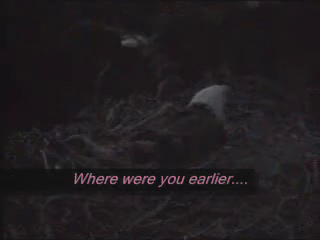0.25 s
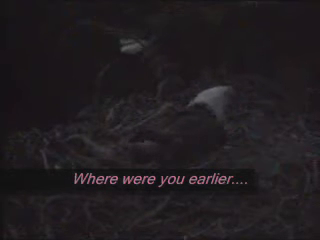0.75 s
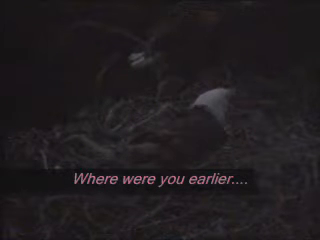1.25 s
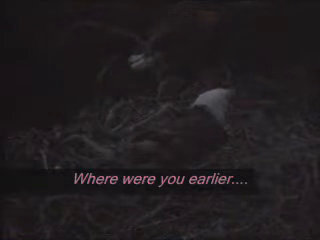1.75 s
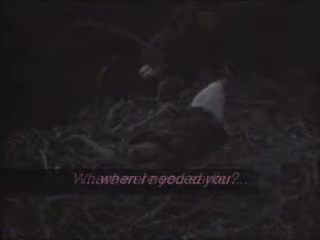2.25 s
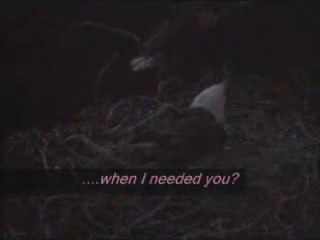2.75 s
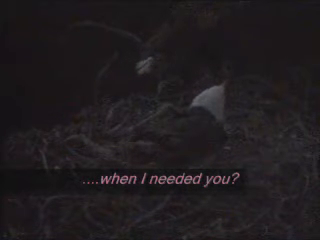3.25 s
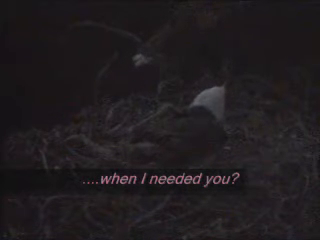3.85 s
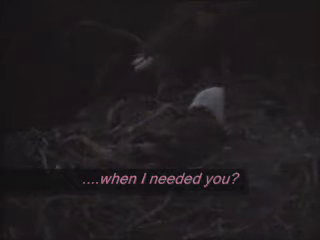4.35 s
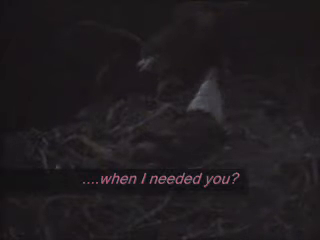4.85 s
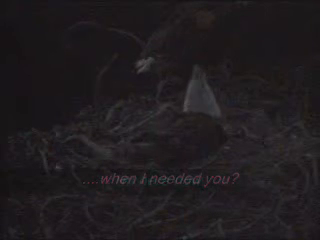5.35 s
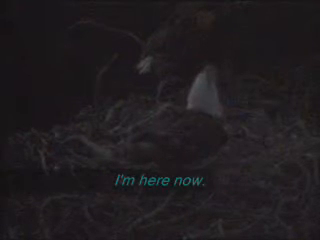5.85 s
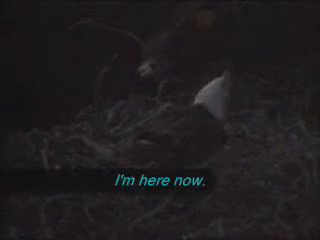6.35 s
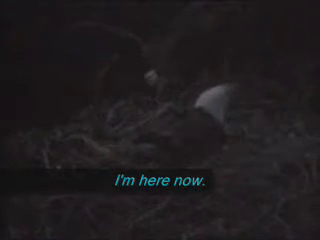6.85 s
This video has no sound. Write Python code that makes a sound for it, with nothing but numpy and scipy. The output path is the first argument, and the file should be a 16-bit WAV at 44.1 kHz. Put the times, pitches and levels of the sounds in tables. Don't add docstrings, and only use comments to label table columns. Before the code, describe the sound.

At a woodland nest, sharp descending series of eagle chirps repeat four times, overloading a cheap microphone, with distant trilling and hiss behind.

```python
import sys
import numpy as np
from scipy import signal
from scipy.fft import rfft, irfft
from scipy.io import wavfile
from scipy.ndimage import uniform_filter1d

SR = 44100
rng = np.random.default_rng(int(sys.argv[2]) if len(sys.argv) > 2 else 0)


def waveform_to_disk(signal):
    frames = np.transpose(np.atleast_2d(signal))
    scaled = np.clip(frames, -1, 1) * 32767
    samples = np.round(scaled).astype(np.int16)
    wavfile.write(sys.argv[1], SR, samples)


def gain_from_db(level_db):
    decades = np.asarray(level_db, float) / 20
    return 10 ** decades


N = 312669
TIME = np.arange(N) / SR

# high trill [level/dB], low trill [level/dB]
CHORUS_DB = (-57.5, -59.5)
# first swell [t/s], spacing [t/s], width [t/s], [level/dB]
NEAR_CALLERS = (1.12, 1.245, .16, -52)
# [f/Hz], [level/dB per Hz]
AIR_SPECTRUM = [(70, -17), (150, -1), (800, 0), (1500, -13), (3000, -8), (6000, -16.5), (11500, -24.5),
                (12500, -56)]
# first [t/s], spacing [t/s], top [f/Hz], fall [f/Hz], [level/dB]
CRICKET = (.145, .051, 4200, 400, -66)
# start [t/s], length [t/s], from [f/Hz], to [f/Hz], [level/dB]
SQUEALS = [
    (5.662, 0.0134, 3470, 6370, -48),
    (5.702, 0.0115, 5784, 4264, -35.5),
    (5.703, 0.0118, 3794, 3060, -33),
    (6.108, 0.0108, 3876, 4263, -38),
    (6.696, 0.006, 3960, 4400, -35.5),
    (6.757, 0.018, 5560, 6600, -47),
    (6.85, 0.007, 4050, 5500, -39),
    (6.861, 0.03, 7150, 6780, -45.5),
]
# [t/s], [f/Hz], [level/dB]
SCREAM_GLIDE = [
    (6.78, 7300, -46.5),
    (6.795, 7092, -41),
    (6.84, 7549, -43.5),
    (6.852, 6900, -39),
    (6.858, 5520, -43.5),
    (6.885, 5581, -35),
    (6.895, 3898, -19.5),
    (6.9, 3216, -40),
    (6.91, 1614, -45),
]
# [f/Hz], [level/dB]
THROAT_LEAK = [(2600, -56), (3250, -26), (4900, -36.5), (5900, -23.5), (6500, -42.5), (7050, -25),
               (7600, -60), (10100, -45.5)]
# start [t/s], length [t/s], top pitch [f/Hz], [level/dB], beak [f/Hz]
MURMUR_NOTES = [(0.188, 0.0239, 1256, -39, 3730), (0.294, 0.0173, 789, -45, 3704),
                (0.352, .014, 742, -48.5, 3860), (0.426, 0.051, 547.4, -32.5, 4574),
                (.885, 0.0223, 804, -33, 3800), (1.487, 0.0309, 575, -60, 2900),
                (1.566, .034, 597, -51, 3300), (3.285, 0.01434, 835.8, -31.5, 3910),
                (4.485, .016, 831.3, -33.5, 3700), (5.598, .06, 886, -39, 3650),
                (5.707, .061, 791.2, -31.5, 3863), (5.941, .094, 509, -33, 3963),
                (6.238, 0.0864, 507, -36.5, 3848), (6.409, 0.0155, 733, -41.5, 3476),
                (6.583, 0.0652, 477.8, -39, 3892), (2.173, .014, 850.6, -33.5, 3284),
                (2.074, 0.016, 836.5, -33.5, 3645)]
# start [t/s], length [t/s], from [f/Hz], to [f/Hz], [level/dB]
HOOK_NOTES = [
    (0.409, 0.0204, 3832, 4030, -33),
    (0.474, 0.0122, 4246, 3794, -27.5),
    (.533, 0.01245, 4150, 4442, -22.5),
    (0.657, 0.01215, 4409, 4085, -25),
    (2.769, 0.0201, 3778, 4325, -16.5),
    (3.923, .025, 3733, 4239, -11),
    (5.129, .027, 3721, 4153, -11.5),
    (6.704, 0.0173, 3672, 3472, -26),
    (6.721, .009, 3580, 4020, -16),
]
# start [t/s], length [t/s], top pitch [f/Hz], [level/dB], upper resonance [level/dB]
RASP_NOTES = [(0.524, 0.0493, 862, -30.5, 0), (0.637, 0.0434, 860.3, -32.5, -7),
              (1.643, 0.0773, 831.8, -28, -5), (1.743, 0.0638, 853.5, -24, 3),
              (1.843, 0.0537, 859, -27.5, -8.5), (1.951, 0.0352, 849.8, -31, -5.5),
              (2.783, 0.055, 844.5, -25.5, -7.5), (2.871, 0.0567, 863.8, -22.5, 3),
              (2.971, 0.05006, 862.4, -21, 1.5), (3.074, 0.0492, 851.6, -22.5, -2.5),
              (3.947, 0.0504, 841, -26.5, -4.5), (4.032, 0.0573, 856.4, -25, -2.5),
              (4.134, .048, 839.5, -22.5, 8), (4.24, 0.054, 840, -32, 1), (5.148, 0.0458, 825.8, -22, 6.5),
              (5.234, 0.0674, 875.7, -26, -4), (5.343, .054, 850.5, -23.5, 2),
              (5.451, 0.0459, 847.1, -20.5, 0), (5.565, 0.0292, 840, -24, -5.5)]
# start [t/s], length [t/s], beak [f/Hz], [level/dB]
PIP_NOTES = [(.635, 0.0149, 4290, -18), (.75, 0.01867, 4193, -12.5), (.771, 0.0086, 4039, -16),
             (.872, 0.0132, 3915, -13.5), (1.855, 0.01463, 4308, -18.5), (1.951, 0.0137, 4215, -13),
             (1.966, 0.0184, 4170, -14), (2.057, 0.0284, 4013, -11.5), (2.171, 0.016, 3957, -15.5),
             (3.079, .011, 4159, -19), (3.088, 0.01626, 4289, -13.5), (3.186, 0.03005, 4150, -9.5),
             (3.268, .021, 4028, -10.5), (4.256, 0.01503, 4164, -14), (4.356, 0.03354, 4000, -12),
             (4.468, 0.0169, 3921, -15.5), (5.576, 0.02106, 4164, -10.5), (5.684, 0.021, 4028, -9.5),
             (5.72, 0.0096, 3879, -17.5), (5.745, 0.014, 3912, -19.5), (5.808, 0.017, 3843, -17.5),
             (7.038, 0.0174, 4518, -16), (7.052, 0.0357, 4639, -20.5)]
# start [t/s], length [t/s], beak [f/Hz], [level/dB]
CLOSING_PIPS = [
    (2.282, 0.0166, 3049, -34.5),
    (3.385, 0.0154, 3189, -23.5),
    (4.586, 0.01726, 3036, -31.5),
    (6.114, 0.02226, 3060, -26.5),
    (6.134, 0.0146, 3050, -28.5),
]
# start [t/s], length [t/s], pitch [f/Hz], [level/dB], beak [f/Hz]
SCREECH_NOTES = [
    (6.725, 0.0495, 902.5, -35, 4420),
    (6.775, 0.1286, 800, -44.5, 4035),
    (6.845, 0.081, 807.2, -39.5, 5580),
]
# attack [t/s], release [t/s], ends [level/dB], fall while held [level/dB],
# beak width [f/Hz], hoarseness [0-1], leak [level/dB]
MURMUR_VOICING = (0.75, -2.33, -10.5, -4, 264, .5, -12.5)
HOOK_VOICING = (-4.74, -0.29, -14.5, 0, 129.5, 0.1373, -13)
RASP_VOICING = (-0.3, 0.34, -8.5, -2, 155.5, 0.31, 0.5)
PIP_VOICING = (.007, .008, -19, -2, 105, .07, -19)
SCREECH_VOICING = (.004, .01, -8, -3, 600, .9, 6)
MURMUR_BEND = (.77, .62, .88, 1.4)
RASP_BEND = (.9, .3, .86, 2.6)
PIP_BEND = (.97, .4, .98, 2)
DC_OFFSET = np.array([[.0015], [.006]])

AIR_DB, SIDE_DB = -58, -23
SYRINX_HZ, BEAK_HZ = 825, 4150
UPPER_HZ, UPPER_WIDTH_HZ, UPPER_LIFT_DB = 4996.4, 170, 1
LOWER_HZ, LOWER_DB, OCTAVE_DB = 3300, -8, -19
FULL_ARCH_S, BEAK_FOLLOWS, HOOK_SWELL = .06, .65, .7
STUTTER_HZ, STUTTER_DB = 60.8, 15.5
TREES_T60_S, TREES_DB = 0.423, -14.5
CLIP_UP, CLIP_DOWN, SQUARE_LAW, THUMP_FROM = .308, .33, 0.064, 0.37


def level(x, db):
    return x * gain_from_db(db) / np.sqrt(np.mean(x ** 2))


def on_log(hz, table):
    f, db = np.transpose(table)
    return np.interp(np.log(np.maximum(hz, 1)), np.log(f), db)


def trill(hz, spread_hz, ring_s, rate_hz, count):
    out, t = 0, TIME[:2048]
    for pitch, pace, turn in rng.standard_normal((count, 3)):
        clicks = np.zeros(N)
        jitter, strength = rng.standard_normal((1500, 2)).T
        at = np.cumsum((1 + .15 * jitter) / (rate_hz * (1 + .15 * pace)))
        at = at[at < TIME[-1]]
        clicks[(at * SR).astype(int)] = gain_from_db(3.0 * strength[:len(at)])
        swell = gain_from_db(7.0 * np.sin(2 * np.pi * (1.3 + .4 * pace) * TIME + 3 * turn))
        ring = t / ring_s * np.exp(-t / ring_s) * np.sin(2 * np.pi * (hz + spread_hz * pitch) * t)
        out = out + signal.oaconvolve(clicks * swell, ring)[:N]
    return level(out, 0)


def choruses():
    high_db, low_db = CHORUS_DB
    high = trill(2187.8, 110., 0.003, 62., count=16) * gain_from_db(high_db)
    low = trill(1123.0, 46.0, 0.0044, 45., count=12) * gain_from_db(low_db)
    return high + low


def air():
    spectrum = gain_from_db(on_log(np.fft.rfftfreq(N, 1 / SR), AIR_SPECTRUM))
    noise = irfft(rfft(rng.standard_normal((2, N))) * spectrum, N)
    mid, side = level(noise, AIR_DB)
    return mid + gain_from_db(SIDE_DB) * side * np.array([[1], [-1]])


def span(table):
    s, *columns = np.transpose(table)
    i = np.arange(int(s[0] * SR), min(int(s[-1] * SR), N))
    fade = np.clip(np.minimum(i - i[0], i[-1] - i) / (.003 * SR), 0, 1)
    return i, fade, [np.interp(TIME[i], s, c) for c in columns]


def flutter(rows, cols, hz):
    z = rng.standard_normal((rows, cols + 600, 2)) @ np.array([1, 1j])
    z = signal.lfilter(*signal.butter(3, hz, fs=SR), z)[:, -cols:]
    return z / np.sqrt(4.4 * hz / SR)


def cricket_chirps():
    first_s, gap_s, hz, fall_hz, db = CRICKET
    return [[(t, hz, db - 4), (t + .01, hz - fall_hz / 3, db), (t + .022, hz - fall_hz, db - 4)]
            for t in first_s + gap_s * np.arange(134)]


def glides():
    squeals = [[(t, from_hz, db), (t + length_s, to_hz, db)] for t, length_s, from_hz, to_hz, db in SQUEALS]
    out = np.zeros(N)
    for table in cricket_chirps() + squeals + [SCREAM_GLIDE]:
        i, fade, (hz, db) = span(table)
        shake = 1 + 0.78 * flutter(1, len(i), 430.0)[0]
        tone = np.exp(2j * np.pi * np.cumsum(hz) / SR)
        out[i] += np.sqrt(2) * fade * gain_from_db(db) * (shake * tone).imag
    return out


def note_shape(start_s, length_s, db, voice, arch):
    attack_s, release_s, ends_db, fall_db = voice[:4]
    u = np.linspace(0, 1, 25)
    attack, release = min(attack_s / length_s, .7), min(release_s / length_s, .3)
    dbs = db + np.interp(u, [0, attack, 1 - release, 1], [ends_db, 0, fall_db, ends_db])
    start, top, end, flat = arch
    rise = (1 - start) * np.abs(1 - u / top) ** flat
    fall = (1 - end) * np.abs((u - top) / (1 - top)) ** flat
    return start_s + length_s * u, dbs, 1 - np.where(u < top, rise, fall)


def murmurs():
    for s, length_s, hz, db, beak_hz in MURMUR_NOTES:
        t, dbs, bend = note_shape(s, length_s, db, MURMUR_VOICING, MURMUR_BEND)
        bend = bend ** min(length_s / FULL_ARCH_S, 1)
        curves = np.c_[t, hz * bend, dbs, beak_hz * bend ** BEAK_FOLLOWS]
        yield (curves, LOWER_HZ, LOWER_DB, *MURMUR_VOICING[4:])


def hooks():
    for s, length_s, from_hz, to_hz, db in HOOK_NOTES:
        attack_s = HOOK_SWELL * length_s if to_hz > from_hz else HOOK_VOICING[0]
        t, dbs, _ = note_shape(s, length_s, db, (attack_s, *HOOK_VOICING[1:]), PIP_BEND)
        hz = np.linspace(from_hz, to_hz, len(t))
        curves = np.c_[t, hz / round(hz.mean() / SYRINX_HZ), dbs, hz]
        yield (curves, UPPER_HZ, -30, *HOOK_VOICING[4:])


def rasps():
    for s, length_s, hz, db, upper_db in RASP_NOTES:
        t, dbs, bend = note_shape(s, length_s, db, RASP_VOICING, RASP_BEND)
        curves = np.c_[t, hz * bend, dbs, BEAK_HZ + 0 * t]
        yield (curves, UPPER_HZ, upper_db + UPPER_LIFT_DB, *RASP_VOICING[4:])


def pips():
    for rows, octave_db in ((PIP_NOTES, -46), (CLOSING_PIPS, OCTAVE_DB)):
        for s, length_s, hz, db in rows:
            t, dbs, bend = note_shape(s, length_s, db, PIP_VOICING, PIP_BEND)
            curves = np.c_[t, hz * bend / round(hz / SYRINX_HZ), dbs, hz * bend]
            yield (curves, 2 * hz, octave_db, *PIP_VOICING[4:])


def screeches():
    for s, length_s, hz, db, beak_hz in SCREECH_NOTES:
        t, dbs, bend = note_shape(s, length_s, db, SCREECH_VOICING, PIP_BEND)
        curves = np.c_[t, hz * bend, dbs, beak_hz * bend]
        yield (curves, UPPER_HZ, -30, *SCREECH_VOICING[4:])


def chitter():
    out, k = np.zeros(N), np.arange(3, 13)[:, None]
    notes = [*murmurs(), *hooks(), *rasps(), *pips(), *screeches()]
    for table, upper_hz, upper_db, width_hz, hoarse, leak_db in notes:
        i, fade, (hz, db, beak_hz) = span(table)
        rasp = min(10 * hoarse ** 2, 1)
        sag_depth = .12 * rasp * min(len(i) / SR / FULL_ARCH_S, 1)
        sag = 1 - sag_depth * np.exp((i - i[-1]) / (.011 * SR))
        hz, beak_hz = hz * sag, beak_hz * sag

        beak = 1 / (1 + ((k * hz - beak_hz) / (1.967 * width_hz)) ** 2) ** 1.958
        upper = gain_from_db(upper_db) / (1 + ((k * hz - upper_hz) / UPPER_WIDTH_HZ) ** 2) ** 1.57
        leak = gain_from_db(leak_db + on_log(k * hz, THROAT_LEAK))
        gain = beak + upper + leak
        breathy = rasp * leak / gain
        gain = gain / np.sqrt(np.sum(gain ** 2, axis=0).mean() / 2)

        hoarse = np.clip(hoarse - .08, 0, 1)
        size = len(k), len(i)
        shake = np.sqrt(1 - hoarse) + np.sqrt(hoarse) * flutter(*size, 0.3426 * hz.mean())
        shake = shake + (.5 * hoarse + breathy) * flutter(*size, .8 * hz.mean())
        shake = shake * gain_from_db(min(hoarse, .2) * STUTTER_DB * flutter(*size, STUTTER_HZ).real)
        shake = shake / np.sqrt(np.sum(np.abs(gain * shake) ** 2) / np.sum(gain ** 2))

        tone = np.exp(1j * k * 2 * np.pi * np.cumsum(hz) / SR + 1j * k ** 2)
        db = db + 1.6 * np.clip(db + 12.5, 0, 2)
        out[i] += fade * gain_from_db(db) * np.sum(gain * (shake * tone).imag, axis=0)
    return out


def trees(x):
    t = TIME[:SR]
    sparse = rng.random(SR) < np.clip(t * .6, 0, 1)
    echo = rng.standard_normal(SR) * sparse / np.sqrt(t + 0.0046) * gain_from_db(-60 * t / TREES_T60_S)
    return signal.fftconvolve(x, echo / np.sqrt(np.sum(echo ** 2)))[:N] * gain_from_db(TREES_DB)


def near_callers():
    first_s, gap_s, width_s, db = NEAR_CALLERS
    from_peak_s = (TIME - first_s + gap_s / 2) % gap_s - gap_s / 2
    swell = np.exp(-(from_peak_s / width_s) ** 2) * (TIME > first_s - gap_s / 2)
    return trill(2145.0, 80.0, 0.002, 60., count=8) * swell * gain_from_db(db)


def scene():
    birds = glides() + chitter()
    return choruses() + air() + birds + trees(birds) + near_callers()


def overload(dry):
    x = signal.resample_poly(dry + SQUARE_LAW * dry ** 2, 4, 1, axis=1)
    x = signal.resample_poly(np.clip(x, -CLIP_DOWN, CLIP_UP), 1, 4, axis=1)
    excess = np.maximum(np.abs(dry) - THUMP_FROM, 0)
    x = x - 1.4 * signal.lfilter(*signal.butter(1, 6., fs=SR), excess)
    x = signal.lfilter(*signal.butter(1, 16., "high", fs=SR), x)
    return signal.sosfiltfilt(signal.ellip(6, .1, 40, 13400, fs=SR, output="sos"), x)


def coarse_bands(x):
    f, t, z = signal.stft(x, SR, nperseg=4096)
    power = uniform_filter1d(np.abs(z) ** 2, size=15, axis=1)
    mask = uniform_filter1d(power.max(axis=1, keepdims=True), size=3, axis=2) * gain_from_db(-87.0)
    chance_db = 16.0 * rng.standard_normal((129, z.shape[2]))
    mask = mask * gain_from_db(np.repeat(chance_db, repeats=16, axis=0)[:len(f)])
    grain = rng.standard_normal(z.shape[1:]) * np.exp(2j * np.pi * rng.random(z.shape[1:]))
    grain = grain + gain_from_db(-16.5) * rng.standard_normal(z.shape)
    grain_db = on_log(f, [(2500, -42), (3300, -13.5), (4100, -27.5), (5000, -22.5), (5600, -9), (12000, -17)])
    z = z + grain * np.sqrt(np.abs(power)) * gain_from_db(grain_db)[:, None]
    keep = (power > mask) | (f < 4700)[:, None]
    return signal.istft(z * keep, SR, nperseg=4096)[1][:, :N]


def top_cut(x):
    return signal.sosfilt(signal.butter(12, 14050, fs=SR, output="sos"), x)


def record(dry):
    x = coarse_bands(overload(dry))
    mix = x * gain_from_db(np.array([[-.1], [.1]])) + DC_OFFSET
    return top_cut(mix)


dry = scene()
out = record(dry)
waveform_to_disk(out)
```